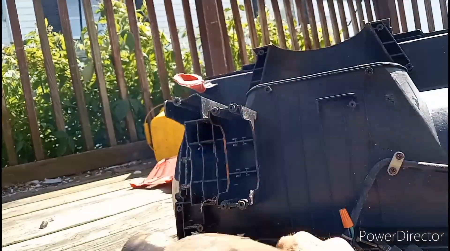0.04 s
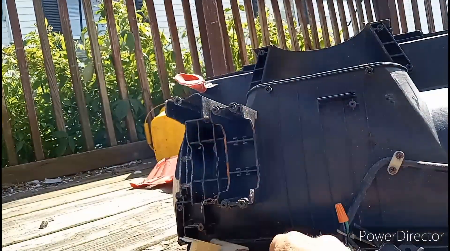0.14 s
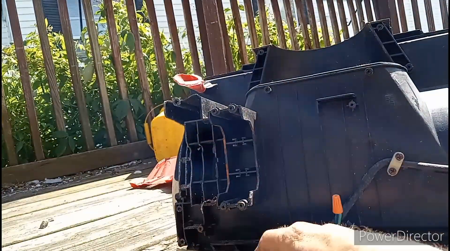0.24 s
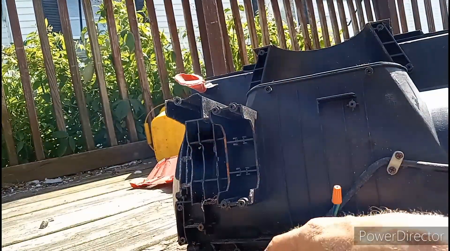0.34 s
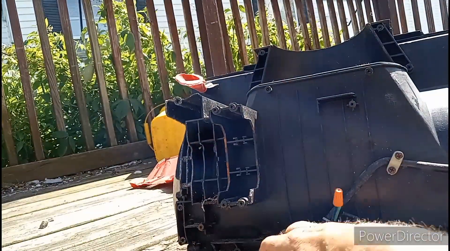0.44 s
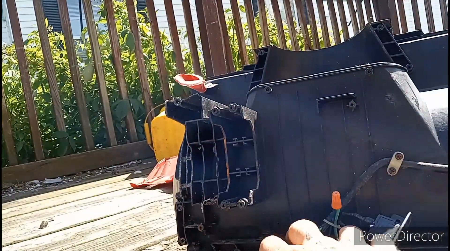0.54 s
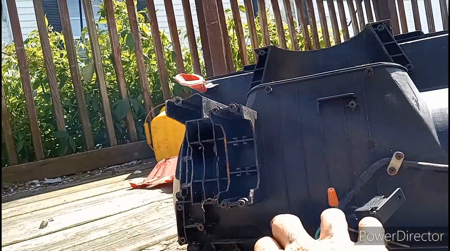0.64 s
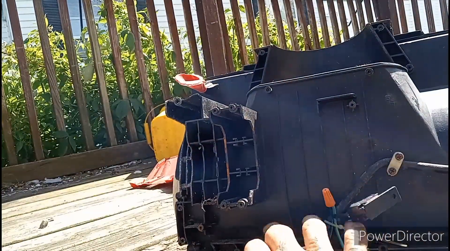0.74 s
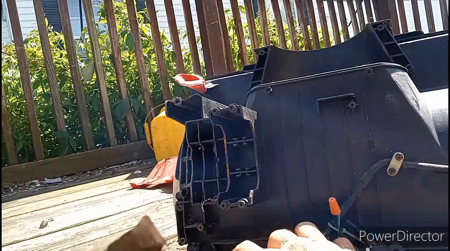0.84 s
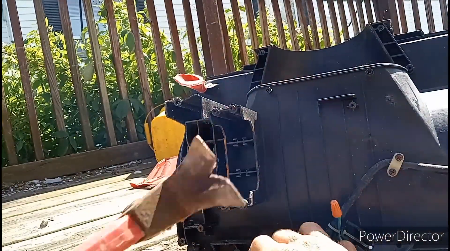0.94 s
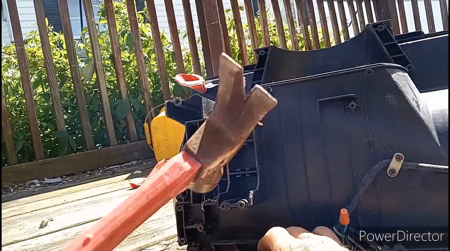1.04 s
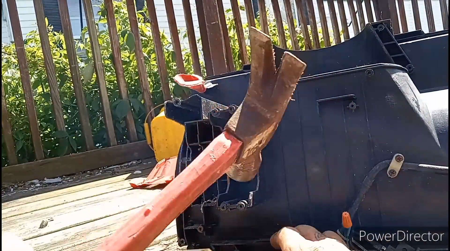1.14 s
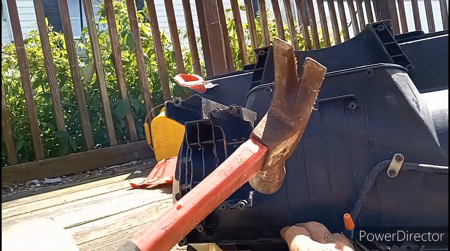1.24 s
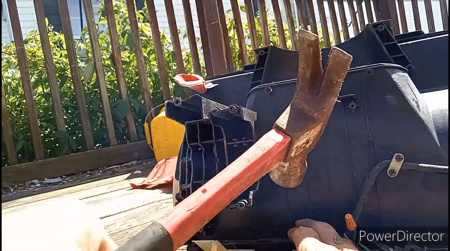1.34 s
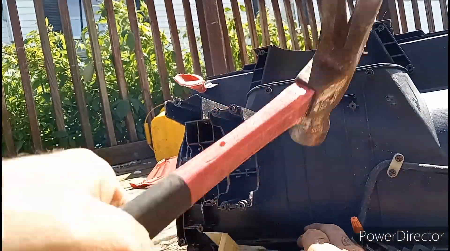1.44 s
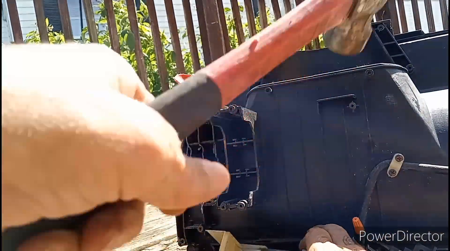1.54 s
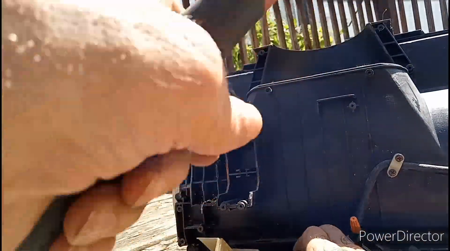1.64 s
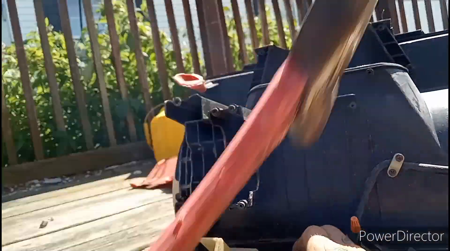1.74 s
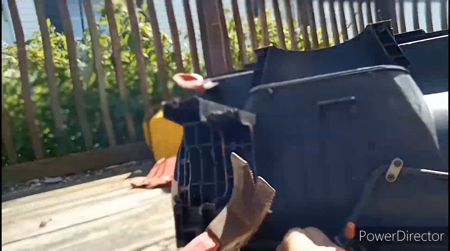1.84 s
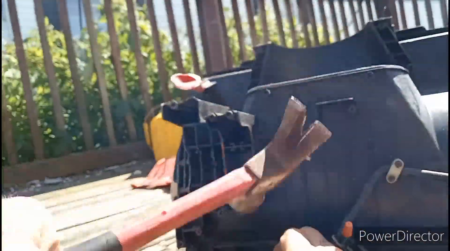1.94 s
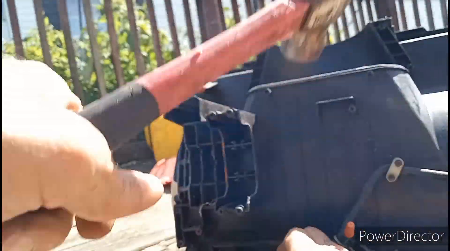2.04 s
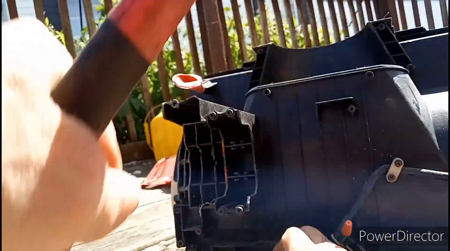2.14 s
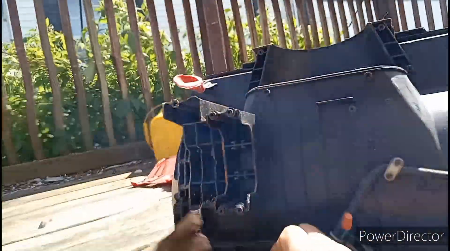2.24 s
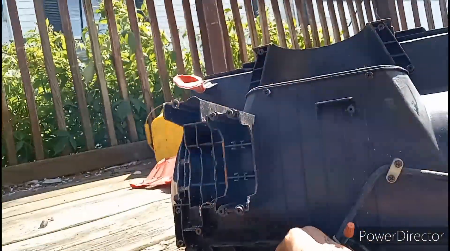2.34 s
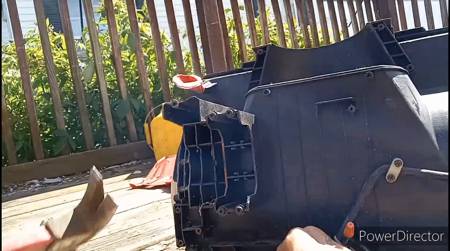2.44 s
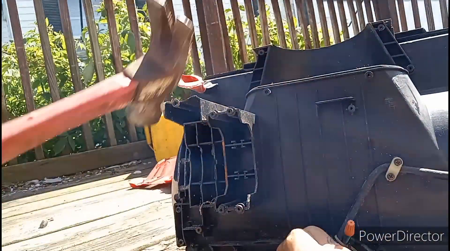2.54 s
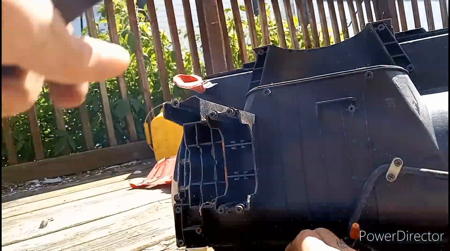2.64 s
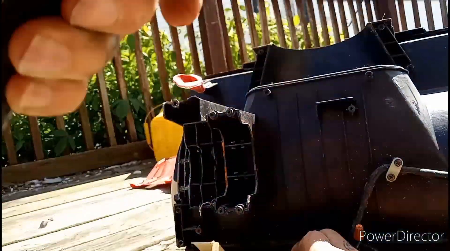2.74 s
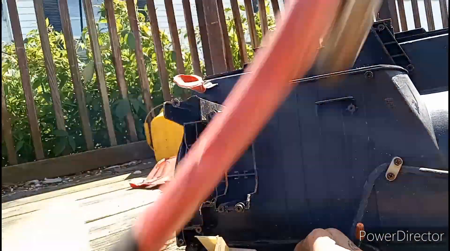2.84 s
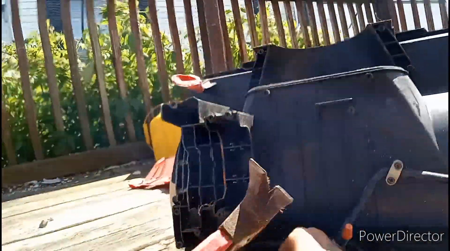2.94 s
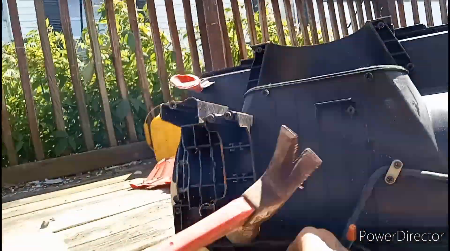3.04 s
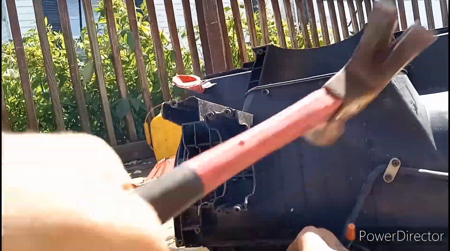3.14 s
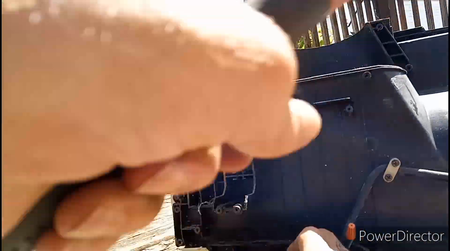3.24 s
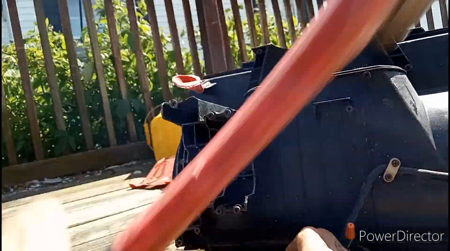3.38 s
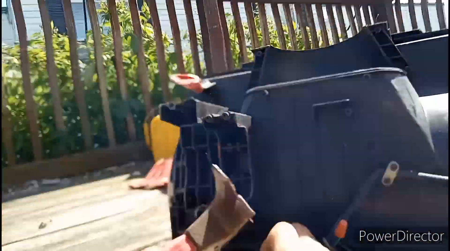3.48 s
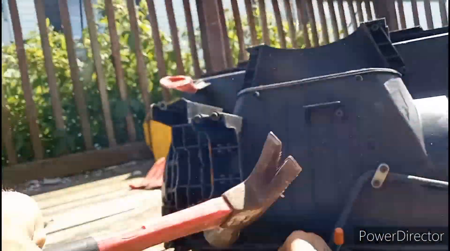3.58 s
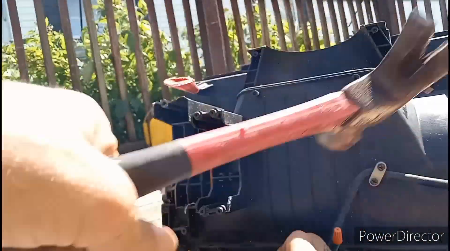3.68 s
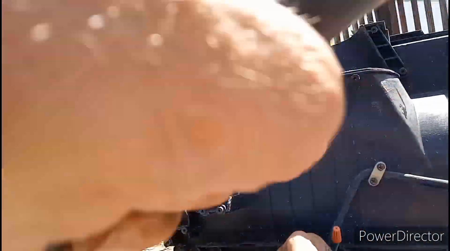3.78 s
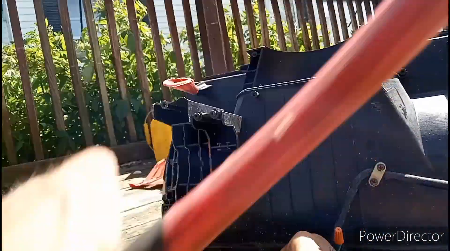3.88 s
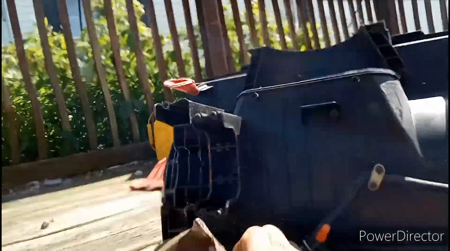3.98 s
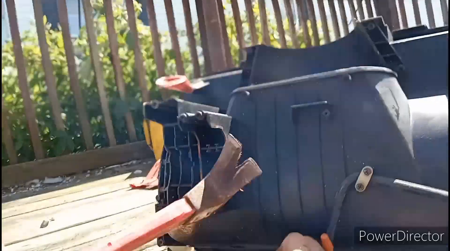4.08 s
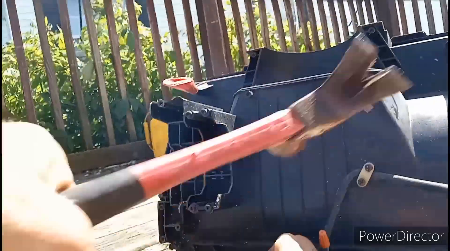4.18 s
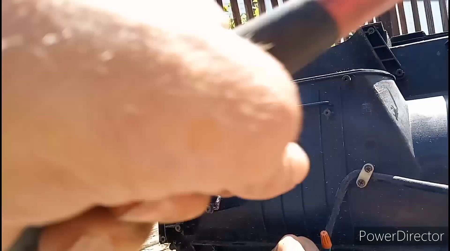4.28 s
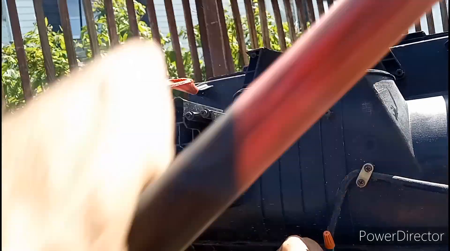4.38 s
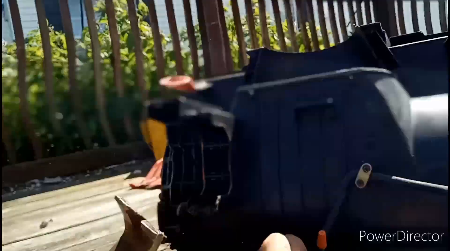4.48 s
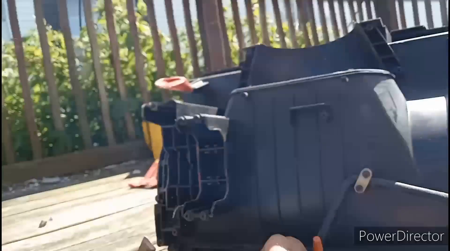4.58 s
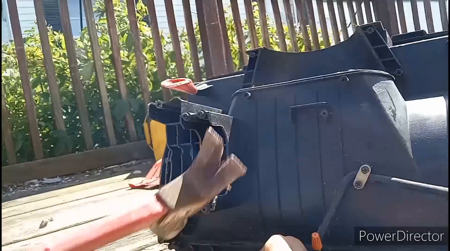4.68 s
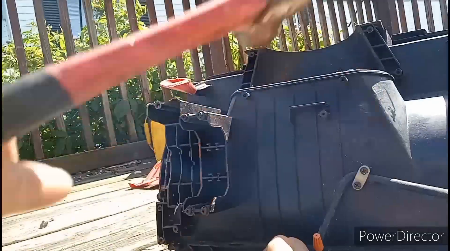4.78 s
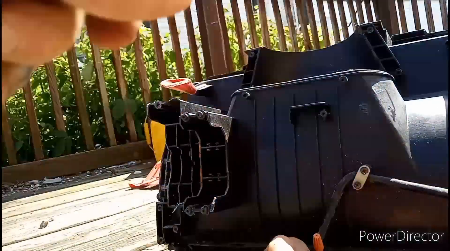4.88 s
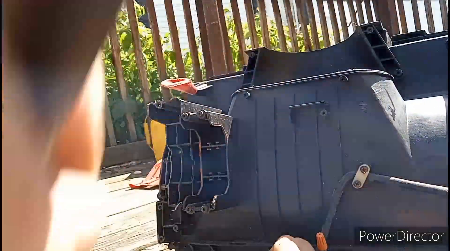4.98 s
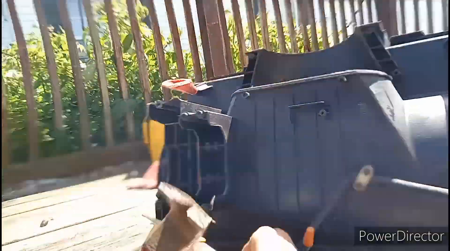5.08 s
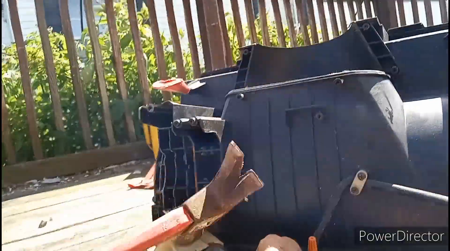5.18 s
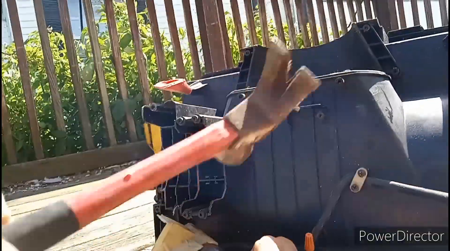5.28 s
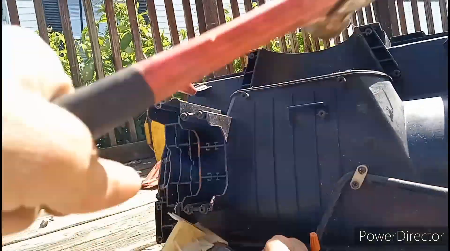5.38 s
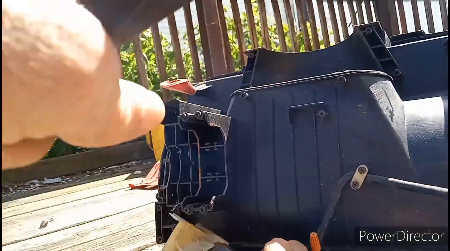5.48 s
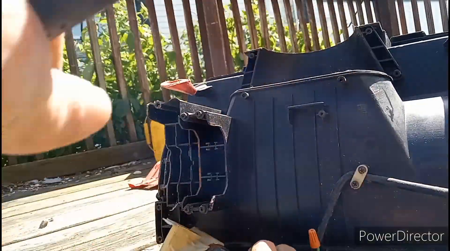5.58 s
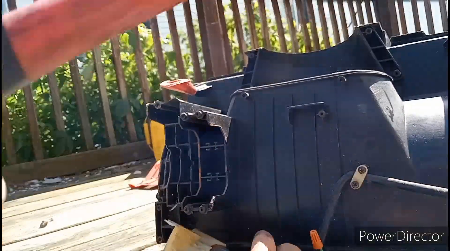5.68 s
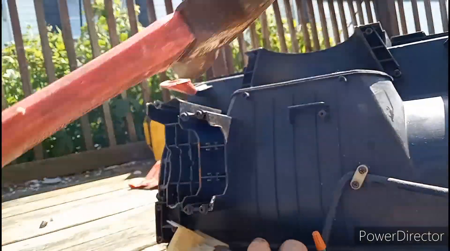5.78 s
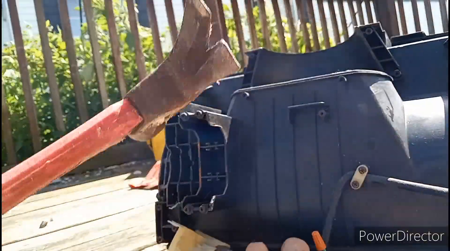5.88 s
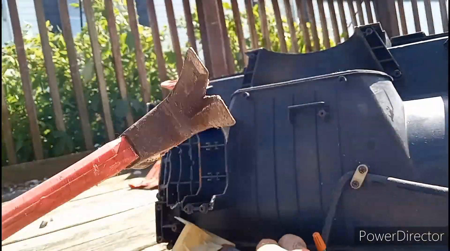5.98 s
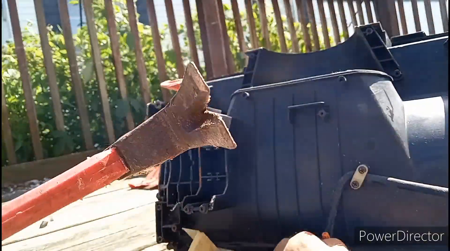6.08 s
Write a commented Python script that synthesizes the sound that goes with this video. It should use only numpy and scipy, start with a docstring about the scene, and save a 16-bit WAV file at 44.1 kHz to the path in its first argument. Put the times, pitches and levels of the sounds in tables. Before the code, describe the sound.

Outdoors on a wooden deck, heard very close in stereo. A faint distant machine hum near 490 Hz swells and fades over soft open air. Around 0.4-0.6 s dull board thumps and tiny scuffing ticks; near 1.5-1.8 s a light scuff, knocks and a puff of low air. At 1.94 s a claw hammer hits a hollow plastic housing: bright crack, low push, short boxy ring, bounces. A lighter blow at 2.39 s brings a board thump. Hard blows follow at 3.04, 3.58, 4.09, 4.61 and 5.21 s, the last with the strongest steely clang. After each, the shell rocks and rattles for a fraction of a second and skids grittily over the boards, fading fast; chips tick, notably at 3.1 and 4.8 s. Short dull echoes trail. From 5.5 s, low, lumpy wind buffets the right side, easing around 5.9 s, then returning until the end near 6.1 s.

```python
"""On a wooden deck in the open air, a claw hammer strikes a hollow plastic housing close to two microphones.
Each blow is a noise crack and a low push, with ringing modes for the plastic shell and the steel head.
The housing bounces, rocks and grates over the boards (knocked modes and fine clicks); chips tick, boards thump.
Scuffs, a distant hum and whine, and rumbling air lie underneath; wind buffets the right microphone at the end."""
import sys
import numpy as np
from scipy import signal
from scipy.fft import rfft, irfft
from scipy.io import wavfile

SR = 44100
rng = np.random.default_rng(int(sys.argv[2]) if len(sys.argv) > 2 else 0)


def inscribe(sig):
    """Save sig as 16-bit PCM at rate SR to the path in sys.argv[1].

    A 1-D sig is mono; a 2-D sig holds one channel per row.
    Samples are clipped to [-1, 1] before scaling.
    """
    pcm = np.round(np.clip(np.atleast_2d(sig).T, -1, 1) * 32767)
    wavfile.write(sys.argv[1], SR, pcm.astype(np.int16))


N = 269892  # length in samples

# Hammer blows; all levels are relative.
# (start_s, modes_db, crack_db, upper_shell_tilt_db_per_octave, steel_db, upper_steel_above_lower_db,
#  scratch_db, rocking_db, rocking_fade_db_per_s, rocking_length_s)
BLOWS = [(1.937, -1.5, -5, 7.5, -2.5, -1.5, -24, -9, 146.5, 0.3),
         (2.387, -12, -12, 11, -3.5, -14, -19, -15, 183.5, 0.15),
         (3.038, -5.5, 1.5, 4, -2, -5, -22.5, -9, 128, 0.58),
         (3.578, 2, -5, 0.8, -8.5, 11.5, -18, -9, 129.5, 0.34),
         (4.088, -1, 2, 2, 1, -11, -22, -13, 109, 0.26),
         (4.606, -2.5, 0.5, 2.5, -4, 6, -21, -11, 137.5, 0.3),
         (5.2099, -7, -2.5, -1.5, 6, 8, -18, -9.5, 137.5, 0.48)]
CONTACT_S = 0.008  # rocking and scratching begin this long after a blow, as the face leaves
SILENT_DB = -110


def amp(db):
    """Turn decibels into a plain multiplier."""
    return 10 ** (np.asarray(db) / 20)


def rms_one(x):
    """Scale a sound to an average (rms) strength of 1."""
    return x / np.sqrt(np.mean(x ** 2) + 1e-20)


def since(s):
    """Seconds passed since a moment, negative before it."""
    return np.arange(N) / SR - s


def at_hz(points, hz):
    """Read a (pitch_hz, level_db) curve at any pitch, on a logarithmic pitch scale."""
    pitch_hz, level_db = np.array(points).T
    return np.interp(np.log(hz), np.log(pitch_hz), level_db)


def butter(x, hz, kind, order=2):
    """Keep only the low, high or middle pitches with a smooth filter."""
    return signal.sosfilt(signal.butter(order, hz, kind, fs=SR, output="sos"), x)


def colour(x, points):
    """Shape noise by a (pitch_hz, level_db) spectrum."""
    hz = np.maximum(np.fft.rfftfreq(N, 1 / SR), 1)
    return irfft(rfft(x) * amp(at_hz(points, hz)), N)


def drift(rate):
    """Slow random wandering with spread 1; a higher rate in Hz wanders faster."""
    r = np.exp(-2 * np.pi * rate / SR)
    wander = signal.lfilter([1], [1, -2 * r, r * r], rng.standard_normal(N + SR))
    return rms_one(wander[SR:])  # skip the first second, while the filter settles


def ring(clicks, hz, t60):
    """Each unit click sets off a sine of height 1 that falls 60 dB in t60 seconds."""
    r, w = amp(-60 / (t60 * SR)), 2 * np.pi * hz / SR
    return signal.lfilter([0, np.sin(w)], [1, -2 * r * np.cos(w), r * r], clicks + 1e-18)


def grains(per_s, spread_db):
    """Random clicks of uneven size and random sign."""
    clicks = rng.random(N) < per_s / SR
    size = amp(spread_db * np.minimum(rng.exponential(1, N), 4))
    return clicks * size * rng.choice([-1, 1], N)


def ports(x, other, alike, lag):
    """The far (right) microphone hears it lag samples later, partly from other surfaces."""
    alike = np.clip(alike, 0, 1)
    far = alike * x + np.sqrt(1 - alike ** 2) * other
    return np.array([x, np.roll(far, round(lag))])


def add(out, s, sound):
    """Mix a short stereo sound in at a time."""
    i = round(s * SR)
    out[:, i:i + sound.shape[-1]] += sound[..., :N - i]


def column(tables, index, fade=0.0054):
    """Follow one column of several time tables, dropping to silence outside them."""
    rows = []
    for table in tables:
        rows.append((table[0][0] - fade, SILENT_DB))
        rows += [(row[0], row[index]) for row in table]
        rows.append((table[-1][0] + 8 * fade, SILENT_DB))
    s, value = np.transpose(sorted(rows))
    return np.interp(np.arange(N) / SR, s, value)


def swell(s, db, rise, fall):
    """Level in dB that climbs to a peak and sinks again, silent outside."""
    foot_db = db - 27  # depth of each climb and fade
    times = [-rise - .005, -rise, 0, fall, fall + .04]
    return np.interp(since(s), times, [SILENT_DB, foot_db, db, foot_db, SILENT_DB])


def cracks():
    """The steel face meets plastic: a few ms of bright noise, then one low push as the wall dents."""
    # Colour of the crack: (pitch_hz, level_db_per_hz), relative
    crack_colour = [(710, -31.5), (1200, -3.5), (4650, -12), (5410, -7.5), (9310, -35.5), (13000, -33),
                    (14800, -18), (16000, -25)]
    out, t = np.zeros((2, N)), np.arange(2000) / SR
    noise = rms_one(ports(*colour(rng.standard_normal((2, N)), crack_colour), 0.35, 3.7))
    attack = np.minimum(t / 0.00031, 1)
    fade = amp(-60 * t / 0.016) + 0.16 * amp(-60 * t / 0.089)
    push = amp(-1.5 - 60 * t / 0.018) * np.sin(2 * np.pi * 230 * t)
    for s, _, crack_db, *_ in BLOWS:
        i = round(s * SR)
        add(out, s - .0002, amp(crack_db) * attack * fade * noise[:, i:i + 2000])
        add(out, s + 0.00029, push * np.ones((2, 1)))
    return out


def rocking_db():
    """Rocking level after each blow: a harder jolt, a steady fade, then a faster fall to rest."""
    jolt_db, jolt_fall_db_s, rest_fall_db_s = 7, 328, 250
    out = np.full(N, float(SILENT_DB))
    for s, *_, db, fall, length in BLOWS:
        t = since(s + CONTACT_S)
        lost_db = np.minimum(fall * t, jolt_fall_db_s * t - jolt_db)
        level = db - lost_db - rest_fall_db_s * np.maximum(t - length, 0)
        out = np.where(t > 0, level, out)
    return out


def shell():
    """Blows strike every mode anew, bounces only the plastic ones; rocking keeps knocking the plastic ones."""
    # Modes of the plastic housing: (pitch_hz, level_db relative, ring_t60_s when struck)
    plastic_modes = [(139.4, -11, 0.22), (199.1, 3, 0.033), (254.9, -9.5, 0.24), (282, -3, 0.064),
                     (363.6, -3, 0.12), (477, -10, 0.073), (579, -2.5, 0.071), (657.3, -4.5, 0.082),
                     (719, -2.5, 0.055), (856.4, -0.5, 0.066), (1023, 1, 0.021), (1160, -11.5, 0.012),
                     (1400, -7, 0.067), (1578, -8, 0.044), (1830, -17.5, .05), (2048, -11.5, 0.045),
                     (2700, -21, 0.01), (3360, -17.5, 0.014)]
    # Modes of the steel hammer head: (pitch_hz, level_db relative, ring_t60_s)
    steel_modes = [(5800, -26.5, .045), (6940, -21, 0.11)]
    # The housing bounces and rings again: (start_s, level_db relative, upper_tilt_db_per_octave)
    bounces = [(1.965, -6.5, 1), (2.005, -17, 5.5), (3.051, -1, 6.5), (3.195, -23, 1), (3.66, -8.5, -0.5),
               (4.221, -14, -0.5), (4.308, -26.5, -7.5), (4.669, -11, 2.5), (4.741, -27, 10),
               (5.226, -7.5, 6), (5.308, -15, 2)]
    # How the shell leans between the microphones: (pitch_hz, left_minus_right_db)
    lean = [(125, 0.5), (250, 4), (500, 0), (1000, -3), (2000, -0.5), (4000, -1.5)]
    push_hz = 300  # modes below this move at once, with the push
    rebound_s = .017  # the upper steel mode sounds when the head touches again

    s, modes_db, _, upper_db, steel_db, high_db, *_ = np.transpose(BLOWS)
    again_s, again_db, again_upper_db = np.transpose(bounces)
    out, rocking = np.zeros((2, N)), np.zeros((2, N))
    knocks = ports(grains(700, 6.5), grains(700, 8.0), 0.9, 0)
    for k, (hz, level_db, t60) in enumerate(plastic_modes + steel_modes):
        plastic = k < len(plastic_modes)
        steel_number = max(k - len(plastic_modes), 0)
        octaves = np.log2(hz / 450)
        # where the face lands tilts the modes
        spot_db = upper_db * octaves if plastic else steel_db + high_db * steel_number
        hit_db = modes_db + level_db - 4.0 + spot_db + rng.normal(0, 1.3, len(s))
        # bending waves reach each panel at their own moment
        late = rng.integers(0, 110, len(s)) * (hz > push_hz)
        at = ((s + rebound_s * steel_number) * SR).astype(int) + late
        sign = np.where(hz > push_hz, rng.choice([-1, 1], len(s)), 1)
        hits = np.zeros(N)
        hits[at] = amp(hit_db) * sign
        if plastic:
            bounce_db = again_db + level_db - 8.5 + again_upper_db * octaves
            bounce_at = (again_s * SR).astype(int) + k
            hits[bounce_at] = amp(bounce_db) * rng.choice([-1, 1], len(again_s))
        # each panel radiates from its own place, so its lag in samples differs
        lag = round(min(hz / 140, 14.5) + 5.5 * rng.uniform(-0.85, 1))
        sides = amp(at_hz(lean, hz) / 2 * np.array([[1], [-1]]))
        struck = ring(hits, hz, t60)
        out += sides * [struck, np.roll(struck, lag)]
        if plastic:
            # shifted knocks, so the modes are not all knocked together
            rocked = amp(level_db) * ring(np.roll(knocks, 997 * k, 1), hz, 0.52 * t60)
            rocking += sides * [rocked[0], np.roll(rocked[1], lag)]
    return out + amp(rocking_db()) * rms_one(rocking)


def grating_db():
    """A fast-fading scratch at each blow; each skid gathers, sags while it slides, and stops."""
    # Skids over the boards: (start_s, gather_s, peak_db, slide_s, sag_db_per_s)
    # start_s begins the gathering; levels are before the treble dulls
    skids = [(1.98, 0.089, -24.5, 0.14, 158.5), (2.415, 0.023, -27.5, 0.064, 32.5),
             (3.085, .088, -22.5, 0.96, 138), (3.67, .045, -22, 0.18, 90), (3.98, .006, -48, .05, 221.5),
             (4.123, 0.028, -25.5, 0.14, 66), (4.679, 0.039, -23, 0.16, 101),
             (5.272, .068, -24.5, 0.14, 62.5), (5.588, 0.01, -49.5, 0.1, 117.5)]
    scratch_fall_db_s, gather_db, stop_fall_db_s = 423.5, 8.5, 353.5
    out = np.full(N, float(SILENT_DB))
    for s, *_, db, _, _, _ in BLOWS:
        t = since(s + CONTACT_S)
        out = np.maximum(out, np.where(t > 0, db - scratch_fall_db_s * t, SILENT_DB))
    for s, rise, db, length, sag in skids:
        t = since(s + rise)
        level = db + gather_db * np.minimum(t / rise, 0)
        level = level - sag * np.clip(t, 0, length)
        level = level - stop_fall_db_s * np.maximum(t - length, 0)
        out = np.maximum(out, np.where(t > -rise - .02, level, SILENT_DB))
    return out


def grating():
    """Ribs drag over gritty boards: clicks that thin out as the skid dies, and loose bits rattling."""
    # Colour of the grating: (pitch_hz, level_db_per_hz), relative
    grit_colour = [(590, -28.5), (1000, -3.5), (1260, -11), (2100, -4), (3380, -4), (3800, -2.5),
                   (5380, -3.5), (6040, 0.5), (7350, -9), (10500, -11), (13800, -18), (14900, -14),
                   (16000, -4.5)]
    dull_hz, bright_db, dulling = 7000, -37, 0.56  # below bright_db the treble drops: dB per dB
    level_db = grating_db()
    per_s = np.clip(7000 * amp(.9 * (level_db + 36)), 500, 7000)
    sides = []
    for _ in range(2):
        fine = rms_one(grains(per_s, 2.5) * np.sqrt(7000 / per_s))  # fewer grains are larger
        bits = 0
        for hz in np.geomspace(1300, 9000, 8):  # loose bits rattle at their own pitches
            bits = bits + ring(grains(70, 4.0), hz, 14 / hz) * hz ** .5
        sides.append(colour(fine + .55 * rms_one(bits), grit_colour))
    flurry = amp(1.6 * drift(70))
    grit = rms_one(ports(*sides, 0.39, 26.0))
    for hz in (2500, 5000):  # the colour shifts as other ribs take the weight
        under = butter(grit, hz, "low")
        grit = under + (grit - under) * amp(1.4 * drift(15))
    low = butter(grit, dull_hz, "low")
    treble = (grit - low) * amp(dulling * np.minimum(level_db - bright_db, 0))
    return amp(level_db) * flurry * (low + treble)


def ticks():
    """A chip or small contact rings briefly at its pitch, with noise around it and a broad click."""
    # Ticks: (start_s, level_db relative, pitch_hz, fade_t60_s, left_minus_right_db)
    # the chip modes also have a 0.022 s fade of their own
    contacts = [(0.436, -46, 2600, 0.14, -7), (0.466, -43, 1770, 0.053, 0), (0.583, -50.5, 2270, 0.16, 1),
                (0.487, -39.5, 2060, 0.093, 1), (1.38, -65, 5950, .03, 0), (1.806, -33.5, 2330, 0.026, 2),
                (2.1865, -37.5, 6070, 0.042, 1), (2.787, -55, 6200, 0.047, -3.5),
                (3.0954, -20, 2480, 0.019, 9), (3.107, -10, 2400, 0.02, 11.5), (3.196, -19, 2300, 0.038, 5),
                (3.301, -30, 6000, 0.038, -2), (3.3392, -26.5, 5100, 0.086, 3),
                (3.405, -41.5, 1980, 0.079, 1), (3.8, -27, 6560, 0.16, 2.0), (3.832, -28, 4900, 0.11, 5),
                (3.888, -31, 4970, 0.014, 7), (3.922, -34.5, 5960, 0.083, 3),
                (3.9875, -35.5, 5870, 0.048, 8), (4.793, -5, 1690, 0.021, -6.5),
                (4.8287, -22, 5040, 0.055, 2), (4.927, -41, 5550, 0.048, 1), (5.08, -58.5, 4970, 0.054, 0),
                (5.2577, -5, 1080, 0.028, -1), (5.3066, -22.5, 1670, 0.098, 14),
                (5.473, -25, 4200, 0.035, 0), (5.561, -34, 874, 0.022, -11), (5.591, -42, 5850, 0.091, 5),
                (2.137, -37, 6550, 0.077, 7), (4.0138, -45, 6130, 0.042, -3),
                (5.8564, -31, 4830, 0.069, 3.5), (5.8895, -35.5, 4600, 0.087, 0)]
    # Modes of a chip: (multiple_of_pitch, level_db relative)
    chip_modes = [(0.999, -0.5), (2.1, -14.5)]
    out, t = np.zeros((2, N)), np.arange(3000) / SR
    t_sides = t - np.array([[0], [.0003]])  # the right microphone hears the modes later
    for s, db, hz, t60, pan_db in contacts:
        noise = ports(*rng.standard_normal((2, 3000)), 0.23, 14.5)
        broad = butter(butter(noise, 760, "high"), min(1.52 * hz, 14000), "low")
        clack = 0
        for ratio, mode_db in chip_modes:
            tone = np.sin(2 * np.pi * min(hz * ratio, 15000) * t_sides)
            clack = clack + amp(mode_db - 60 * t / 0.022) * tone
        around = rms_one(butter(noise, [hz * 0.77, hz * 1.214], "band"))
        burst = 0.77 * around + 1.25 * broad + 1.55 * clack
        sides = amp(db - 4.0 + np.array([[pan_db], [-pan_db]]) / 2)
        add(out, s, sides * amp(-60 * t / max(t60, .005)) * burst)
    return out


def thumps():
    """A damped low tone, softly started, roughened by noise around it from loose boards."""
    # Dull knocks through the boards: (start_s, level_db relative, pitch_hz, fade_t60_s)
    # the tone fades faster still, through a second fade of 0.34 s
    knocks = [(0.426, -38, 91.5, 0.26), (0.467, -15, 186, 0.081), (0.5, -29.5, 146, 0.42),
              (0.5699, -13.5, 204, 0.039), (.585, -28.5, 157, 0.23), (1.507, -33.5, 166.4, 0.24),
              (1.522, -28.5, 169, 0.1), (1.679, -34.5, 116, 0.18), (1.805, -42, 700, 0.069),
              (2.455, -9.5, 206, 0.19), (2.518, -19.5, 170.5, 0.34), (3.372, -29.5, 391, 0.13),
              (3.941, -38.5, 368, 0.21), (4.791, -16, 246, 0.13), (4.899, -36, 325, 0.19)]
    out, t = np.zeros((2, N)), np.arange(12000) / SR
    for s, db, hz, t60 in knocks:
        noise = ports(*rng.standard_normal((2, 12000)), 0.94, 0)
        rough = rms_one(butter(noise, [hz * 0.5, hz * 1.46], "band"))
        tone = np.sin(2 * np.pi * hz * t) * amp(-60 * t / 0.34) + 0.35 * rough
        fade = amp(db - 60 * t / max(t60, .02))
        add(out, s, fade * np.minimum(t / 0.0057, 1) * tone)
    return out


def scuffs():
    """Hands and tools scuff the boards: sparse grains, with a scrape resonance of its own in each stroke."""
    # Strokes: (peak_s, level_db relative, scrape_pitch_hz, swell_s, fade_s)
    strokes = [(.47, -41.5, 2340, 0.052, 0.025), (.588, -57, 2270, 0.028, 0.086),
               (1.494, -60, 1940, 0.043, 0.25), (1.5, -53.5, 619, 0.066, .15), (1.5, -87, 5950, .05, 0.073),
               (1.52, -70, 4800, 0.036, 0.08), (2.328, -68.5, 4650, 0.068, 0.13),
               (4.98, -68, 4500, 0.12, .2), (2.796, -62, 5900, 0.06, 0.065)]
    grit, out = ports(grains(1000, 4.0), grains(1000, 5.0), 0.97, 7.9), 0
    broad = rms_one(butter(grit, [800, 6500], "band"))
    for s, db, hz, rise, fall in strokes:
        scrape = rms_one(butter(grit, [hz * .96, hz * 1.04], "band"))
        out = out + amp(swell(s, db, rise, fall)) * (.35 * broad + scrape)
    return out


def wind():
    """Eddies push on the microphone ports: lumpy low noise, own in each channel, and single sharp buffets."""
    # Strength of the wind on the right microphone: (time_s, level_db)
    gust_curve = [(5.484, -55), (5.512, -20), (5.706, -20), (5.9, -42), (5.922, -46.5), (5.962, -15),
                  (5.994, -27.5), (6.082, -17), (6.12, -23)]
    # Sharp buffets, mostly on the right: (start_s, level_db before a low-pass, settled_pitch_hz)
    buffets = [(5.504, -13.5, 101.5), (5.56, -10.5, 232), (5.588, -18.5, 103), (5.615, -8, 155),
               (5.731, -15.5, 210), (5.655, -19.5, 150), (5.679, -13, 131), (5.766, -17, 119.5),
               (5.82, -19, 118), (5.855, -13, 124.3), (5.889, -12, 96.6), (5.96, -14, 217),
               (6.03, -20.5, 194), (6.058, -9, 145), (6.082, -24, 160)]
    lee_db = -30  # the left microphone is sheltered
    push = rng.standard_normal((2, N)) * amp(3.8 * np.array([drift(30), drift(30)]))
    push = rms_one(butter(butter(push, [90, 190], "band", order=1), 290, "low", order=3))
    gust = column([gust_curve], index=1)
    out, t = push * amp([gust + lee_db, gust]), np.arange(3000) / SR
    for s, db, hz in buffets:
        # starts high, sags at once
        falling = np.sin(2 * np.pi * hz * (t + 0.0016 * (1 - np.exp(-t / 0.0058))))
        soft = butter(falling, min(4.2 * hz, 900), "low", order=3)
        add(out, s, amp(db - 60 * t / 0.079) * soft * amp([[-26], [0]]))
    return out


def hum():
    """A far machine tone that swells and fades, with a faint whine near its octave."""
    # Stretches of hum, each a list of (time_s, rms_level_db)
    hum_curves = [
        [(0.0, -47), (0.088, -45), (0.282, -61), (0.48, -40.5), (0.638, -44.5), (0.78, -70), (1.512, -60.5),
         (1.832, -72), (1.88, -57)],
        [(2.62, -53.5), (2.954, -63), (2.98, -65)],
        [(3.42, -51.5), (3.514, -52), (3.53, -54.5)],
    ]
    # Faint whines: (peak_s, rms_level_db, pitch_hz)
    whines = [(.11, -58, 936), (1.64, -64.5, 974), (2.93, -57, 975)]
    hz_now = 490 + 1.3 * drift(5)
    tone = np.sin(2 * np.pi * np.cumsum(hz_now) / SR) * amp(column(hum_curves, index=1))
    waver = np.cumsum(12 * drift(13)) / SR
    for s, db, hz in whines:
        level_db = db - 202 * np.abs(since(s))  # rises and falls at 202 dB per second
        tone = tone + np.sin(2 * np.pi * (hz * since(s) + waver)) * amp(level_db)
    return np.sqrt(2) * ports(tone, 0, 1.0, 3.3)  # root 2 makes the levels rms


def air():
    """Outdoor wash whose treble wavers in level, each band on its own, and low rumble swelling in each
    microphone."""
    # Colour of the open air: (pitch_hz, level_db_per_hz), relative
    air_colour = [(15, -47.5), (25, -36), (53, -4), (153, -11), (195, -16), (373, -17.5), (427, -21),
                  (489, -15), (734, -20), (962, -21), (1520, -23.5), (6560, -39.5), (16000, -79)]
    # Swells of low rumble on both microphones: (peak_s, level_db, swell_s, fade_s)
    rumbles = [(1.68, -34.5, 0.014, 0.18), (5.16, -38, 0.15, .03)]
    wash = rms_one(ports(*colour(rng.standard_normal((2, N)), air_colour), 0.21, 0))
    edges = np.geomspace(800, 12800, 7)
    wavering_treble = 0
    for low_hz, high_hz in zip(edges, edges[1:]):
        band = butter(wash, [low_hz, high_hz], "band")
        wavering_treble = wavering_treble + band * amp(1.1 * drift(12))
    wash = butter(wash, edges[0], "low") * amp(2.0 * drift(3)) + wavering_treble
    lumps = amp(9 * np.array([drift(6.4), drift(21)]))
    rumble = rms_one(butter(lumps * rng.standard_normal((2, N)), [45, 120], "band"))
    # the microphones' own noise
    hiss = amp(-78.5) * butter(rng.standard_normal((2, N)), 11000, "high")
    swelling = sum(amp(swell(*rumble_row)) for rumble_row in rumbles)
    return hiss + amp(-53.5) * wash + swelling * rumble


def scene():
    """All sources, with two dull echoes of the hammering from railing and wall."""
    # a small shell radiates no deep bass
    hammering = butter(shell() + cracks(), 120, "high", order=3)
    near = hammering + grating() + ticks()
    dull = butter(near, 3000, "low")
    # delays in samples; the first echo swaps left and right
    echo = amp(-17.5) * np.roll(dull[::-1], 430, 1) + amp(-24.0) * np.roll(dull, 1150, 1)
    return near + echo + scuffs() + thumps() + hum() + air() + wind()


def record(dry):
    """Loud peaks flatten as in an overload, then the deep bass and the highest treble are cut."""
    flattened = dry / (1 + np.abs(dry / .86) ** 6) ** (1 / 6)
    x = butter(flattened, 52, "high", order=2)
    cutoff_hz = 16500
    return signal.sosfilt(signal.cheby2(12, 60, cutoff_hz, fs=SR, output="sos"), x)


dry = scene()
out = record(dry)
inscribe(out)
```